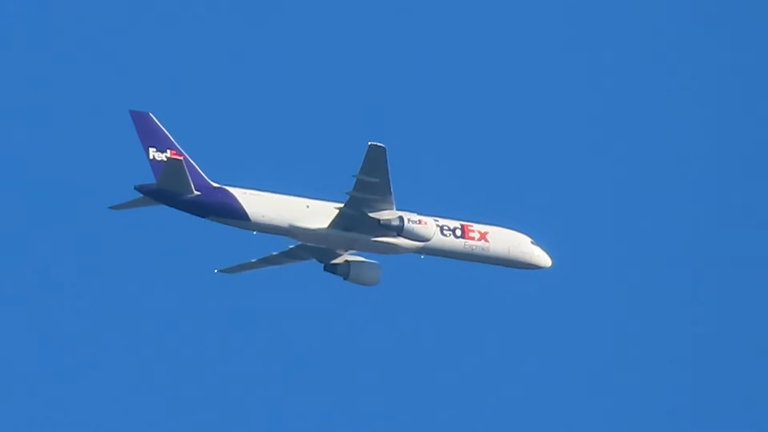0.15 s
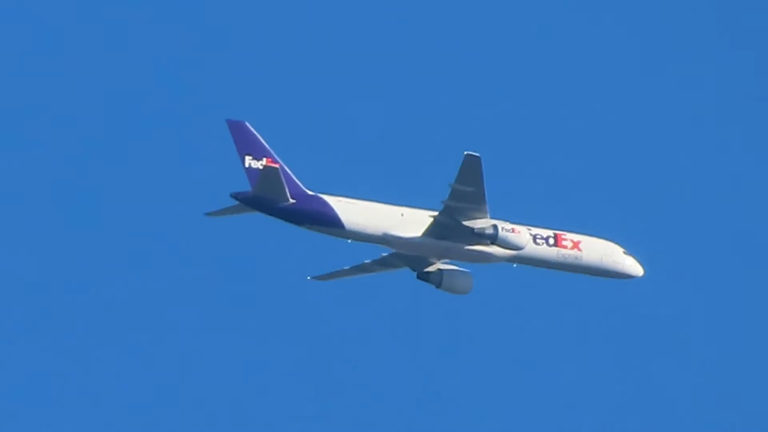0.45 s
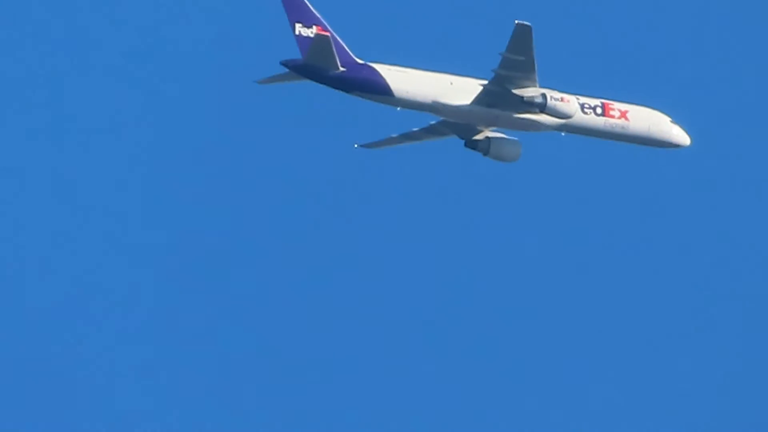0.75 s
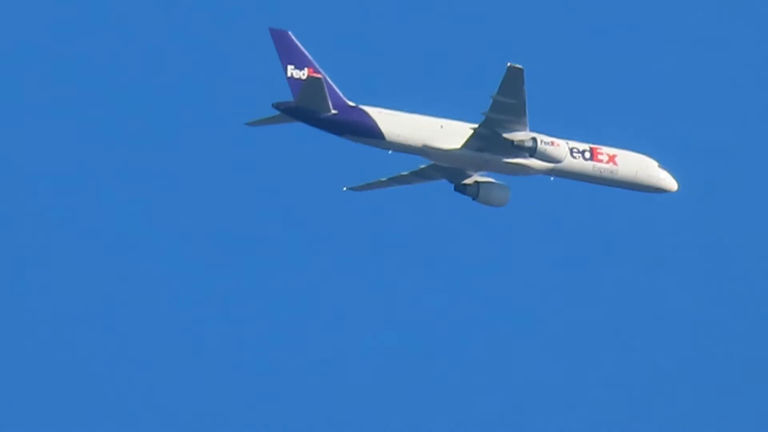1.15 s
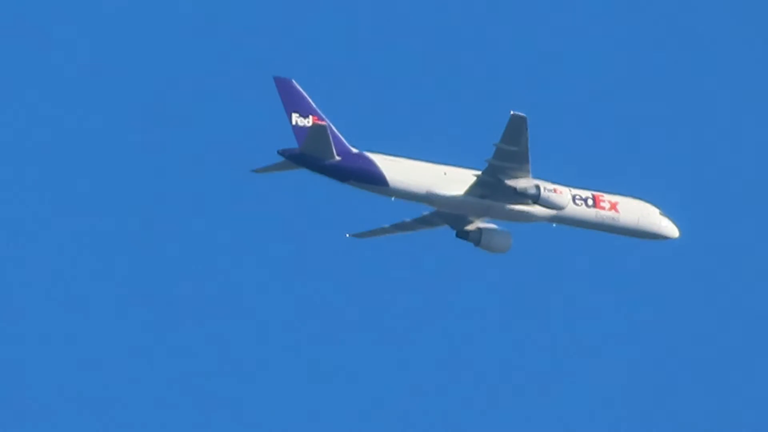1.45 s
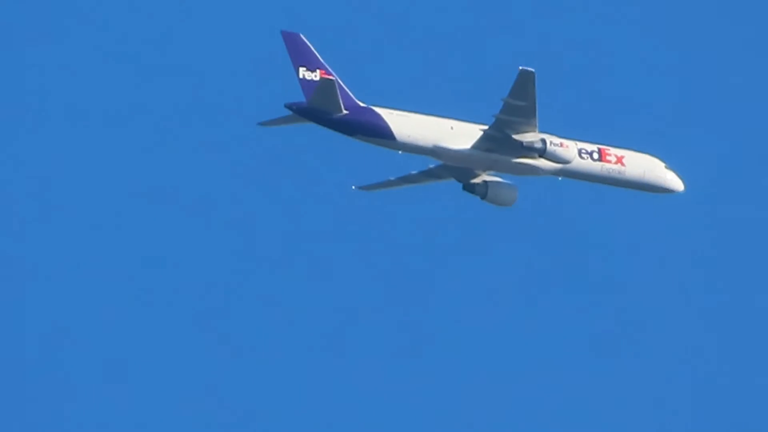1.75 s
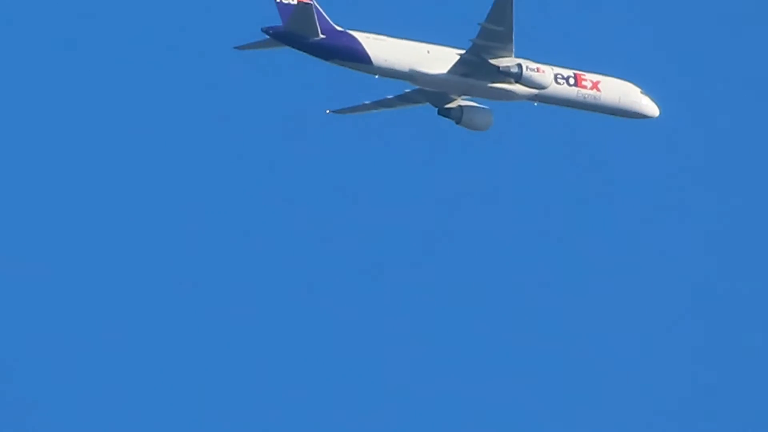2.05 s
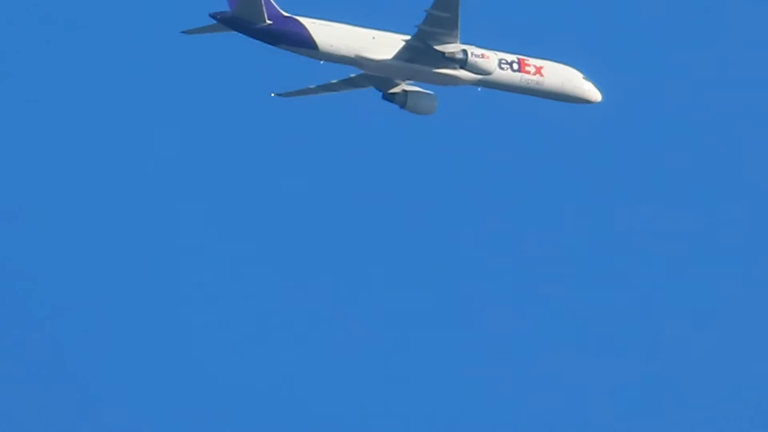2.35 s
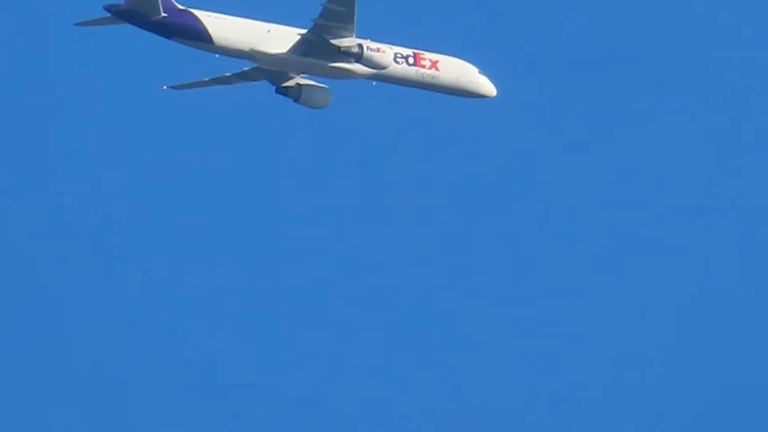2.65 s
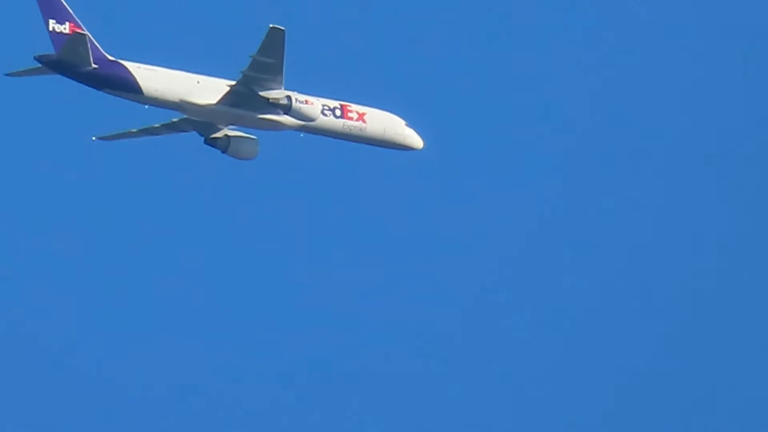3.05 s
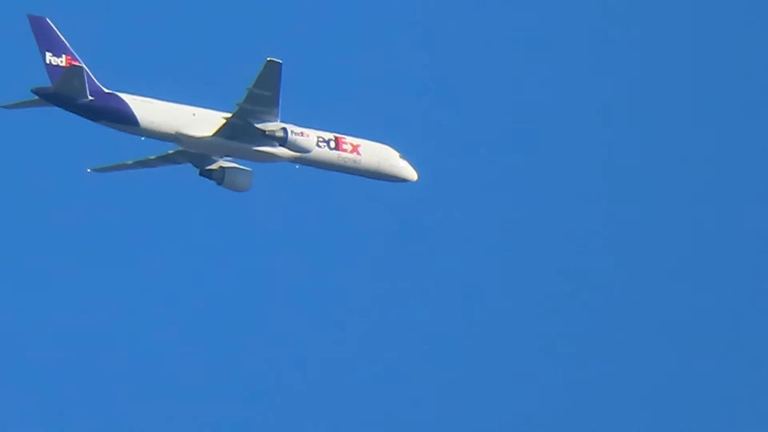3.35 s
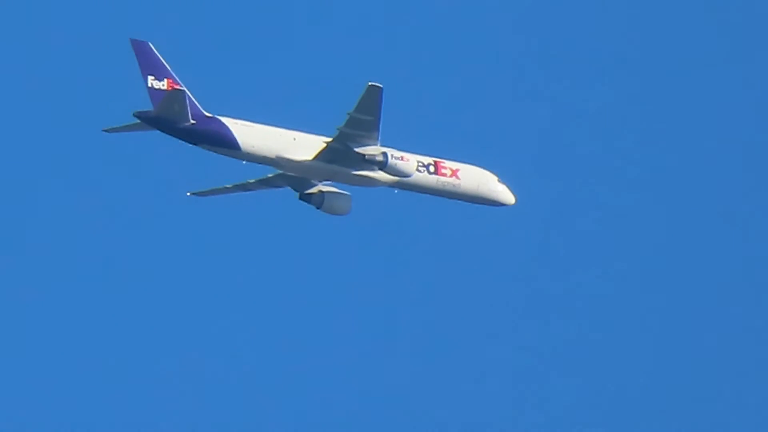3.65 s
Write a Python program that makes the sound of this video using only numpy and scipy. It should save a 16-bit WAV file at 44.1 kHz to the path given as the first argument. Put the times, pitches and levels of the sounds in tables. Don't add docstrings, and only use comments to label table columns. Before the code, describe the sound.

Dull, low jet airliner roar from high overhead, with small camera lens clicks and whirrs close by

```python
import sys
import numpy as np
from scipy import signal
from scipy.fft import rfft, irfft
from scipy.io import wavfile
from scipy.ndimage import uniform_filter1d

SR = 44100
rng = np.random.default_rng(int(sys.argv[2]) if len(sys.argv) > 2 else 0)


def makeup_ratio(level_db):
    decades = np.asarray(level_db, float) / 20
    return 10 ** decades


def file_out(sig):
    cols = np.atleast_2d(sig).T
    lim = np.clip(cols, -1, 1)
    pcm = np.round(lim * 32767).astype(np.int16)
    wavfile.write(sys.argv[1], SR, pcm)


N = 167580
TIME = np.arange(N) / SR
FREQ = np.fft.rfftfreq(N, 1 / SR) + 1e-3
CROSS_HZ = 1432


def level(x, db):
    return x * makeup_ratio(db) / np.sqrt(np.mean(x ** 2))


def on_log(table):
    hz, db = np.array(table).T
    return np.interp(np.log(FREQ), np.log(hz), db)


def curve(table, axis):
    rows = np.array(table)
    return np.interp(TIME, rows[:, 0], rows[:, axis])


def hump(hz, width):
    return 1 / (1 + ((FREQ ** 2 - hz ** 2) / (FREQ * width)) ** 2)


def coloured_noise(gain):
    def shape(noise):
        return irfft(rfft(noise) * gain, N)
    return shape


def walk(rate):
    hold = int(SR / rate)
    steps = np.repeat(rng.standard_normal(N // hold + 1), hold)
    return 1.3 * uniform_filter1d(uniform_filter1d(steps, hold), hold)[:N]


# pitch_hz, level_db
SIDE_WIDTH = [(60, -59), (110, -24.5), (200, -13), (380, -8.5), (700, -6), (1290, -3.5), (9000, -5),
              (14000, -2.5)]


def field(gain):
    mid, side = rfft(rng.standard_normal((2, N)))
    return irfft(np.array([mid * gain, side * gain * makeup_ratio(on_log(SIDE_WIDTH))]), N)


def wavering(table, width, trim_db, side_db):
    slow = irfft(rfft(rng.standard_normal((4, N))) / (1 + (2 * FREQ / width) ** 2), N)
    phase = 2 * np.pi * np.cumsum(curve(table, axis=1)) / SR
    band = level(slow[:2] * np.cos(phase) + slow[2:] * np.sin(phase), 0)
    return band * makeup_ratio(curve(table, axis=2) + trim_db + np.array([[0], [side_db]]))


def struck(events, modes, attack_s, scatter_db, detune, size=3000):
    out, t = np.zeros((len(events), N + size)), TIME[:size]
    hz, db, hold, t60 = np.array(modes).T[:, :, None]
    sign = (-1) ** np.arange(len(modes))[:, None]
    chance = rng.standard_normal((len(events), 2, len(modes), 1))
    for k, ((s, peak_db), (loudness, tuning)) in enumerate(zip(events, chance)):
        decay_db = 60 * np.clip(t - hold, 0, 1) / t60
        fade = makeup_ratio(peak_db + db + scatter_db * loudness - decay_db) * np.clip(t / attack_s, 0, 1)
        tone = sign * np.sin(2 * np.pi * hz * (1 + detune * tuning) * t)
        at = int(s * SR)
        out[k, at:at + size] = np.sum(fade * tone, axis=0)
    return out[:, :N]


# pitch_hz, level_db
ROAR_COLOUR = [(20, -22), (45, -3), (70, 0.5), (175, -8), (290, -12), (400, -17), (600, -20.5),
               (1500, -28.5)]
# start_s, level_db
ROAR_SWELL = [(0.0, -41), (0.02, -42), (1.72, -41), (1.9, -44.5), (1.94, -40.5), (2.32, -42.5), (2.39, -39),
              (2.47, -41.5), (3.04, -38), (3.17, -44), (3.24, -38.5), (3.8, -41.5)]
SWELL_MEAN_DB, SWELL_SHARE_HIGH = -38.5, 0.09


def roar():
    swell = curve(ROAR_SWELL, axis=1) - SWELL_MEAN_DB
    colour = makeup_ratio(on_log(ROAR_COLOUR)) / np.sqrt(1 + (FREQ / CROSS_HZ) ** 4)
    spectrum = rfft(level(field(colour), -34.5))
    out = 0
    for hz in 22 * 2. ** np.arange(8):
        band = np.cos(np.pi / 2 * np.clip(np.log2(FREQ / hz), -1, 1)) ** 2
        share = 1 if 60 < hz < 200 else SWELL_SHARE_HIGH
        flicker_db = .7 * walk(1.5) + .7 * walk(9)
        out = out + irfft(spectrum * band, N) * makeup_ratio(share * swell + flicker_db)
    return out


# start_s, pitch_hz, level_db
FAN_HUMP = [(0.0, 255, -41.5), (0.42, 275, -36.5), (0.58, 250, -43.5), (0.75, 250, -38.5),
            (1.08, 230, -31.5), (1.17, 235, -40), (1.36, 240, -40), (1.46, 245, -34), (1.62, 240, -42),
            (1.74, 255, -33.5), (1.87, 245, -42.5), (2.07, 228, -33), (2.18, 240, -42), (2.55, 240, -44),
            (2.95, 252, -32.5), (3.15, 250, -33), (3.62, 225, -32), (3.8, 235, -36.5)]


def fan():
    return wavering(FAN_HUMP, width=59.5, trim_db=-1.5, side_db=-24)


# start_s, level_db
FOCUS_STEPS = [(0.153, -40), (0.453, -43), (0.553, -35), (0.653, -39), (0.953, -34), (1.154, -36),
               (1.254, -35), (1.32, -36), (1.421, -34), (1.521, -48), (1.621, -48.5), (1.721, -42.5),
               (1.888, -38), (1.988, -44), (2.188, -30), (2.255, -32.5), (2.355, -35), (2.455, -30),
               (2.555, -34), (2.655, -34.5), (2.722, -31.5), (2.822, -38), (2.922, -52.5), (3.122, -38),
               (3.222, -45), (3.322, -37), (3.389, -36), (3.556, -36), (3.656, -37), (3.756, -34.5)]
SOFT_STEPS = [.052, .119, 0.252, .319, .353, 0.754, .853, 1.054, 1.787, 2.088, 3.022, 3.487]
SOFT_STEP_DB = -40
# pitch_hz, width_hz, level_db
BODY_MODES = [(240, 100, -4), (350, 90, -4), (470, 110, 0), (880, 350, -9), (1110, 160, -9),
              (1650, 400, -16), (2400, 700, -24), (4200, 2500, -38)]
FOCUS_LEAD_S, FOCUS_ATTACK_S, FOCUS_T60_S, FOCUS_MID_DB = .004, .003, .1, -4


def focus(size=3000):
    out, t = np.zeros((2, N + size)), TIME[:size]
    shape = np.clip(t / FOCUS_ATTACK_S, 0, 1) * makeup_ratio(-60 * t / FOCUS_T60_S)
    colour = np.sqrt(sum((makeup_ratio(db) * hump(hz, width)) ** 2 for hz, width, db in BODY_MODES))
    buzz = coloured_noise(colour)(rng.standard_normal((2, N)))
    for s, db in list(FOCUS_STEPS) + [(s, SOFT_STEP_DB) for s in SOFT_STEPS]:
        at = int((s - FOCUS_LEAD_S) * SR)
        step = np.take(buzz, np.arange(at, at + size), axis=1, mode="wrap") * shape
        even = np.sqrt(np.sum(shape ** 2) / np.sum(step ** 2, axis=1, keepdims=True))
        out[:, at:at + size] += step * makeup_ratio(db) * even
    firm = signal.butter(3, [200, 6000], "band", fs=SR, output="sos")
    return signal.sosfilt(firm, out[:, :N]) * makeup_ratio(np.array([[FOCUS_MID_DB], [0]]))


# start_s, peak_db, left_right_db
STEPPER_BURSTS = [
    (.7696, -36, -3),
    (.847, -40, -3),
    (1.9028, -34.5, -6),
    (2.0233, -40, -2),
    (2.2911, -35.5, -5),
    (2.4478, -41, -8),
    (3.0942, -35, -4),
    (3.5253, -35.5, -4.5),
    (3.7926, -36, -3),
]
# pitch_hz, level_db, hold_s, t60_s
BARREL_MODES = [(450, 3, .007, .035), (750, -5, .006, .03), (965, -7, .006, .035), (1340, -4, .0075, .02),
                (1550, -10.5, .005, .02), (1720, -9, .002, .025), (1945, -9, .004, .02),
                (2170, -18, .006, .015), (2490, -17, .008, .012), (3000, -17, .008, .01),
                (3500, -20, .007, .01), (3950, -24, .007, .01), (4300, -27, .007, .01)]
BURST_ATTACK_S, BURST_TRIM_DB = .0014, -.5


def stepper():
    rows = np.array(STEPPER_BURSTS)
    events = rows[:, :2] + [-BURST_ATTACK_S / 2, BURST_TRIM_DB]
    ring = struck(events, BARREL_MODES, BURST_ATTACK_S, scatter_db=1, detune=.004)
    rasp = level(coloured_noise(hump(1500, 1500))(rng.standard_normal(N)), -11)
    ring = ring + rasp * uniform_filter1d(np.abs(ring), size=120)
    ring = signal.sosfilt(signal.butter(4, 4600, fs=SR, output="sos"), ring)
    pan = makeup_ratio(np.array([rows[:, 2], -rows[:, 2]]) / 2)
    return pan @ ring


# start_s, peak_db
CARRIAGE_KNOCKS = [(0.552, -39), (0.621, -34), (0.884, -34), (1.254, -29.5), (1.284, -32.5), (1.446, -36),
                   (1.545, -40), (1.58, -45), (1.739, -37), (1.858, -34), (2.187, -34), (2.239, -36),
                   (2.252, -27), (2.354, -36), (2.486, -39), (2.553, -29), (2.618, -30), (2.657, -28),
                   (2.72, -28), (2.75, -40), (3.059, -48), (3.321, -39), (3.458, -39), (3.487, -30),
                   (3.655, -37)]
# pitch_hz, level_db, t60_s
CARRIAGE_MODES = [(345, 3, .03), (470, 4, .035), (700, -6, .02), (880, -2, .03), (1080, -4, .03),
                  (1400, -9, .025), (1800, -13, .02), (2250, -10, .025)]
KNOCK_TRIM_DB = -7


def knocks():
    modes = [(hz, db, 0, t60) for hz, db, t60 in CARRIAGE_MODES]
    events = np.array(CARRIAGE_KNOCKS) + [0, KNOCK_TRIM_DB]
    return struck(events, modes, attack_s=.0015, scatter_db=2.5, detune=.03).sum(axis=0)


# start_s, pitch_hz, level_db
MOTOR_WHIRR = [(0.0, 467, -44), (0.06, 458, -45), (1.63, 459, -41), (1.67, 459, -53), (1.72, 458, -31.5),
               (1.76, 460, -53.5), (2.14, 458, -33), (2.18, 456, -46), (2.36, 461, -31.5), (2.38, 461, -41),
               (2.71, 460, -36), (2.96, 456, -46), (3.2, 460, -37), (3.8, 459, -43.5)]


def whirr():
    return wavering(MOTOR_WHIRR, width=57, trim_db=-3.5, side_db=-8.5)


# pitch_hz, width_hz, level_db, wander_db
WHIRR_OVERTONES = [(882, 320, -55, -0.2), (1336, 160, -64, -1.6)]
WHIRR_MEAN_DB, OVERTONE_SHARE, OVERTONE_SMOOTH_S = -55.5, 0.26, 0.17


def overtones():
    smooth_db = uniform_filter1d(curve(MOTOR_WHIRR, axis=2), int(OVERTONE_SMOOTH_S * SR))
    work_db = OVERTONE_SHARE * (smooth_db - WHIRR_MEAN_DB)
    out = 0
    for hz, width, db, wander_db in WHIRR_OVERTONES:
        out = out + level(field(hump(hz, width)), db) * makeup_ratio(work_db + wander_db * walk(1.18))
    return out


# start_s, peak_db, pitch_hz
HAND_BUMPS = [
    (0.845, -22.5, 72),
    (2.329, -23, 105.7),
    (3.406, -17.5, 94),
]
BUMP_RISE_S, BUMP_T60_S = 0.015, 0.091


def bumps(size=8000):
    out, t = np.zeros((2, N + size)), TIME[:size]
    for s, db, hz in HAND_BUMPS:
        at = int(s * SR)
        fade = (1 - np.exp(-t / BUMP_RISE_S)) * makeup_ratio(db - 60 * t / BUMP_T60_S)
        out[0, at:at + size] += fade * 2 * np.sin(2 * np.pi * hz * t)
    return out[:, :N]


# start_s, pitch_hz, level_db
DRONE_LOW = [(0.0, 63.4, -60), (0.08, 58.4, -55), (0.3, 54.6, -54), (0.61, 51.9, -35), (0.72, 60, -37),
             (0.74, 60.26, -28), (0.98, 60.06, -40), (1.14, 63.8, -25.5), (1.21, 65.8, -39),
             (1.67, 66, -35), (1.8, 56.9, -29), (1.94, 63, -39), (2.73, 60.9, -40.5), (3.56, 61.7, -33),
             (3.67, 60.63, -31), (3.8, 59.4, -62)]
# start_s, pitch_hz, level_db
DRONE_UPPER = [(0.0, 86, -46), (0.08, 84.3, -31), (0.33, 82, -32), (0.5, 80, -40), (1.59, 76.0, -44),
               (1.69, 87.3, -33.5), (2.17, 82.2, -43), (2.43, 102.7, -34), (2.57, 74.7, -35),
               (2.95, 76.76, -37), (3.09, 89.4, -34), (3.45, 92.85, -33), (3.79, 79.8, -46), (3.8, 76, -56)]
DRONE_WIDTH_HZ = 8


def drone():
    tone = 0
    for table, trim_db in ((DRONE_LOW, -3.5), (DRONE_UPPER, -9.5)):
        hz = curve(table, axis=1) + DRONE_WIDTH_HZ * 0.2993 * walk(5.5)
        loudness = makeup_ratio(curve(table, axis=2) + trim_db + 1.23 * walk(8.9))
        tone = tone + np.sqrt(2) * np.sin(2 * np.pi * np.cumsum(hz) / SR) * loudness
    blur = wavering(DRONE_UPPER, width=9.4, trim_db=-5.5, side_db=-41)
    return np.array([tone, 0 * tone]) + blur


# pitch_hz, level_db
HISS_COLOUR = [(600, -1), (1500, -0.5), (2000, -8.5), (4400, -11.5), (8000, -20.5), (11000, -28.5),
               (13800, -33), (15500, -40)]


def hiss():
    return level(field(makeup_ratio(on_log(HISS_COLOUR)) / np.sqrt(1 + (CROSS_HZ / FREQ) ** 4)), -55)


def flutter(sound):
    middle = coloured_noise(hump(1600, 1500))(sound)
    return middle * (makeup_ratio(1.4 * walk(28) - 0.26) - 1)


def scene():
    air = roar() + bumps() + overtones() + hiss()
    mid, side = air + fan() + focus() + whirr() + drone() + flutter(air)
    motors = stepper() + knocks()
    return np.array([mid + side, mid - side]) + motors


def band_limit(x):
    return signal.sosfilt(signal.butter(12, 15300, fs=SR, output="sos"), x)


def record(dry):
    mix = dry + .0008
    return band_limit(mix)


dry = scene()
out = record(dry)
file_out(out)
```